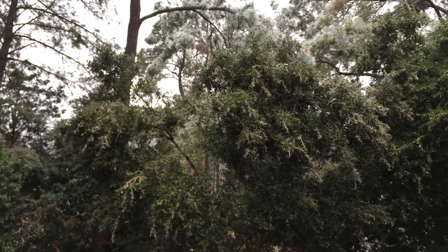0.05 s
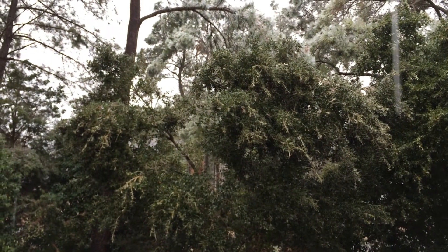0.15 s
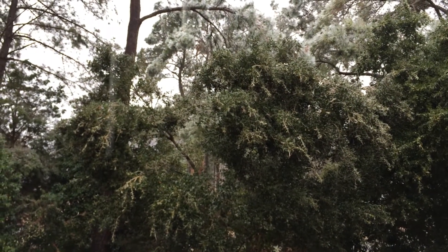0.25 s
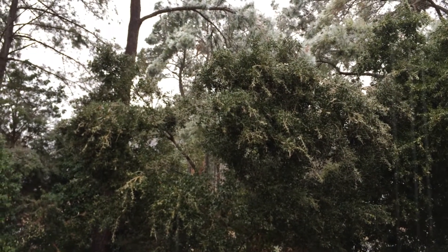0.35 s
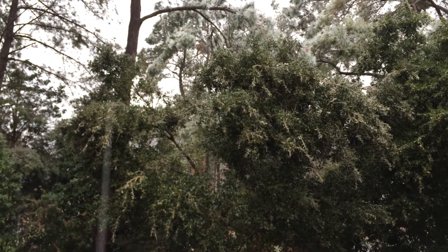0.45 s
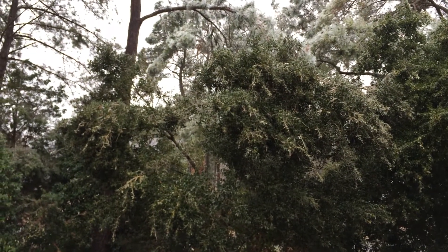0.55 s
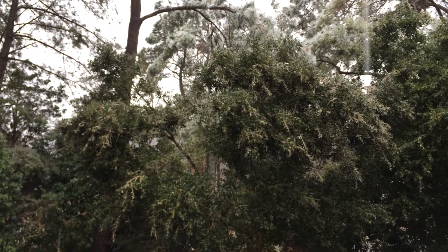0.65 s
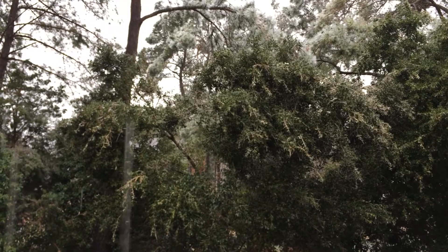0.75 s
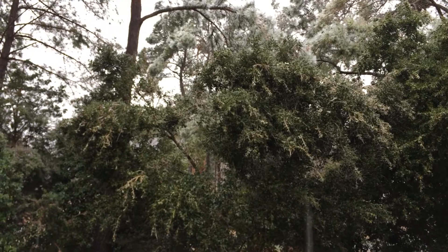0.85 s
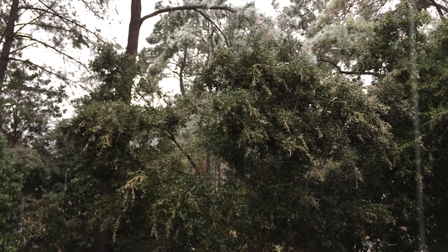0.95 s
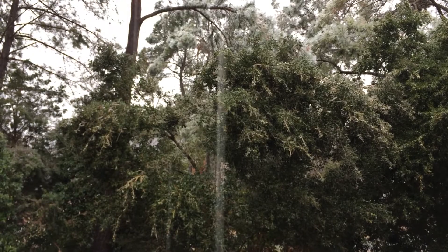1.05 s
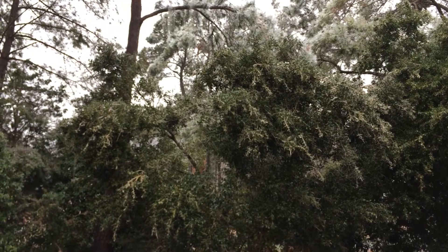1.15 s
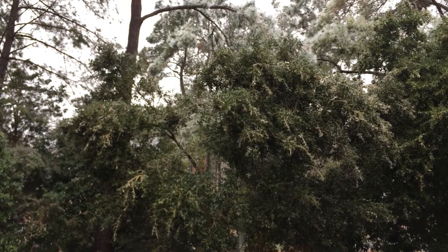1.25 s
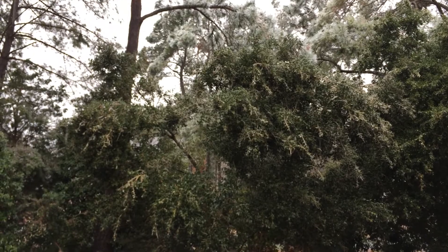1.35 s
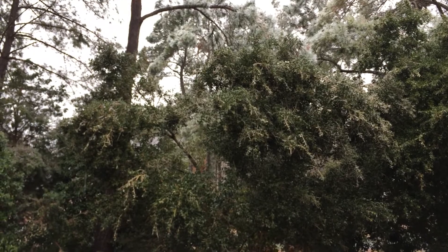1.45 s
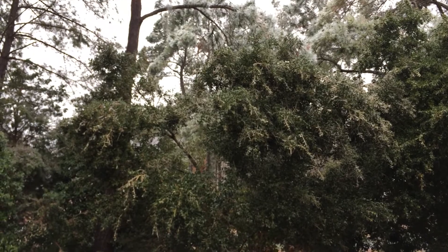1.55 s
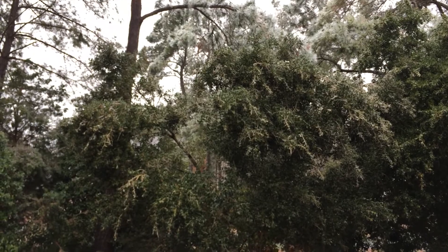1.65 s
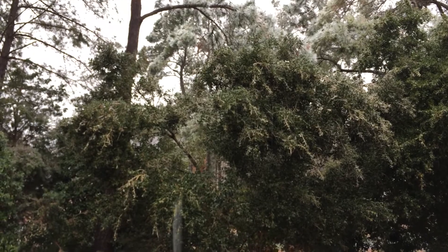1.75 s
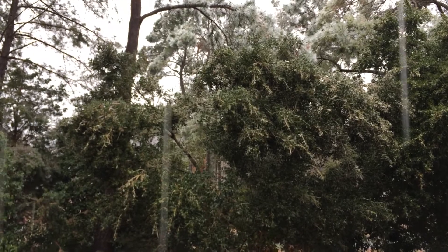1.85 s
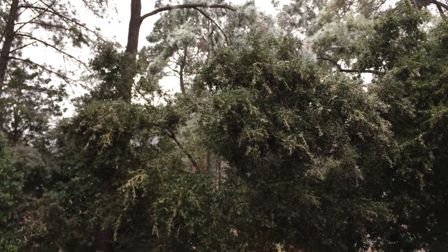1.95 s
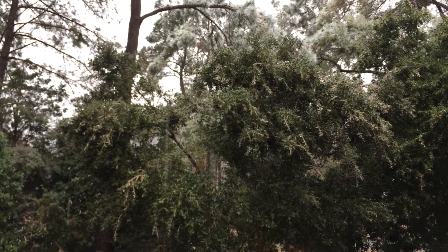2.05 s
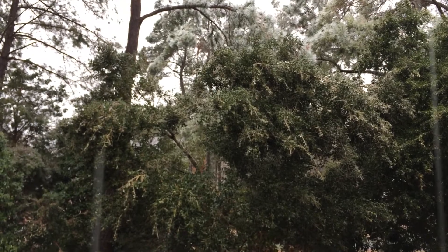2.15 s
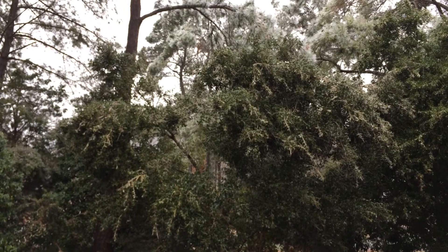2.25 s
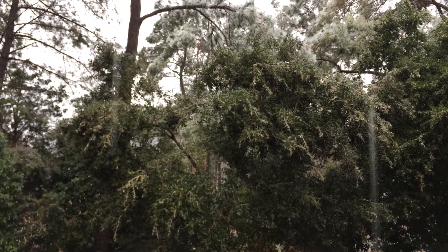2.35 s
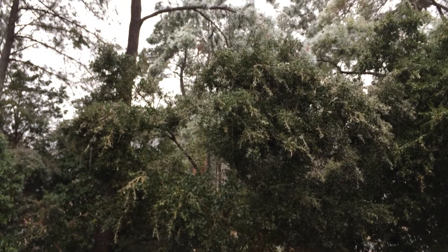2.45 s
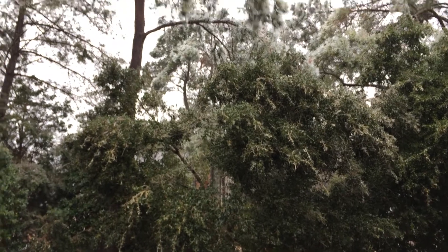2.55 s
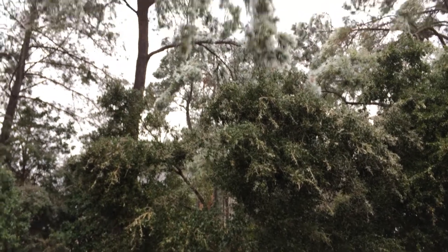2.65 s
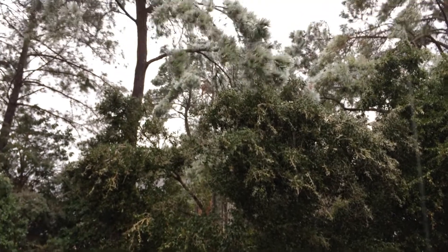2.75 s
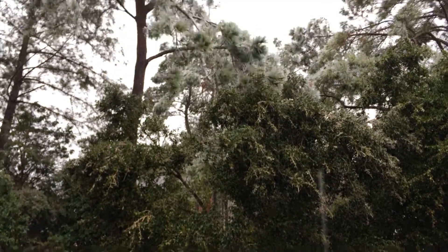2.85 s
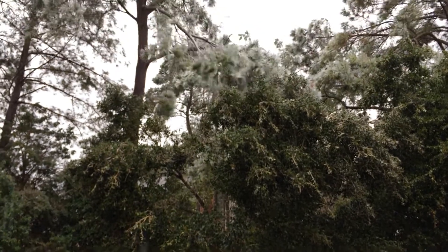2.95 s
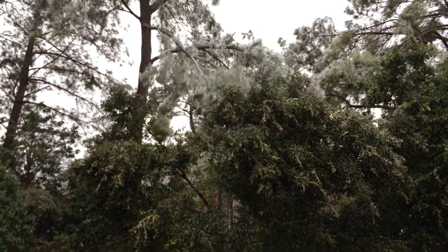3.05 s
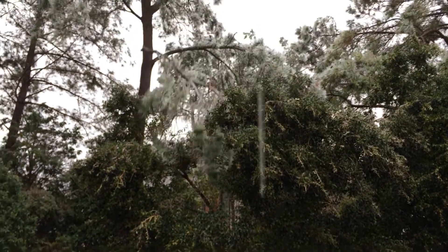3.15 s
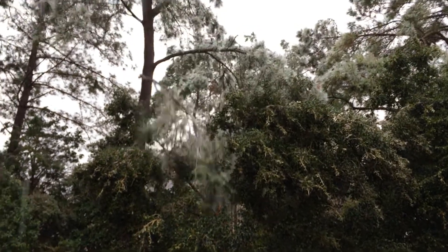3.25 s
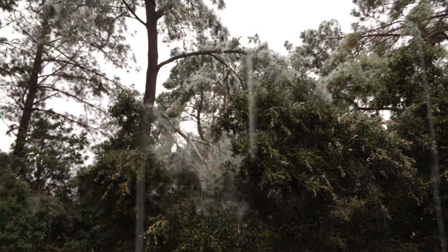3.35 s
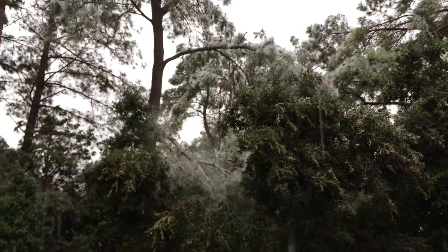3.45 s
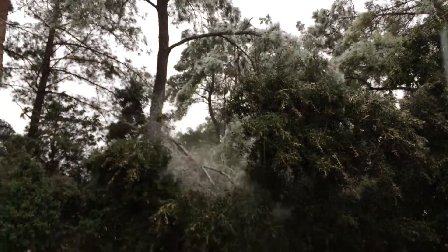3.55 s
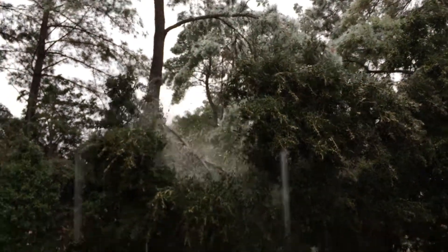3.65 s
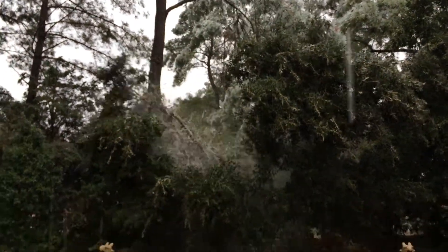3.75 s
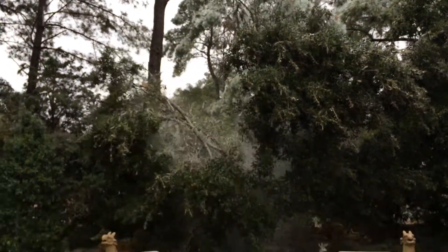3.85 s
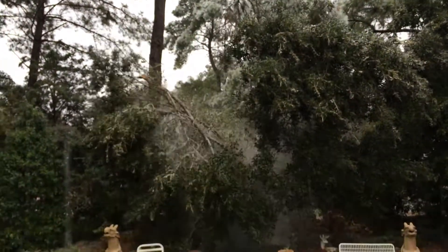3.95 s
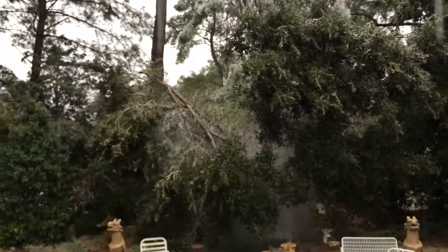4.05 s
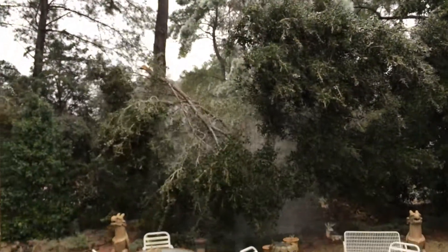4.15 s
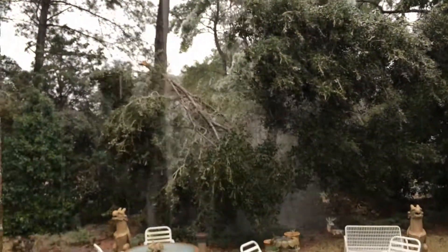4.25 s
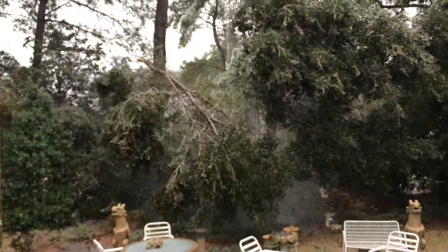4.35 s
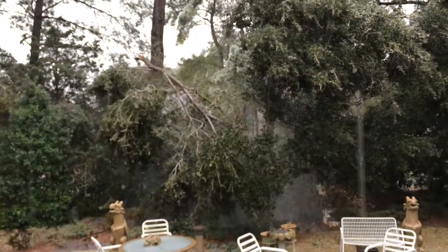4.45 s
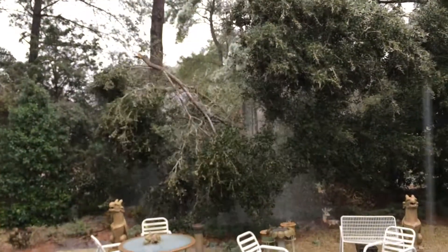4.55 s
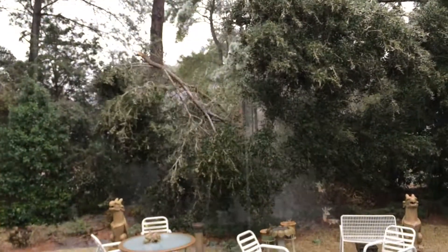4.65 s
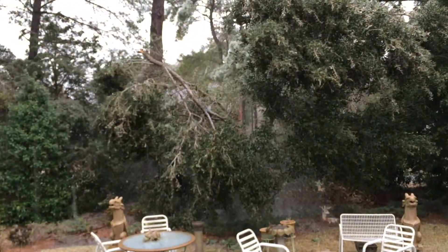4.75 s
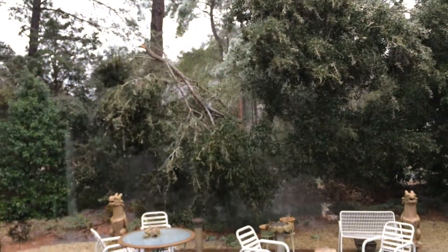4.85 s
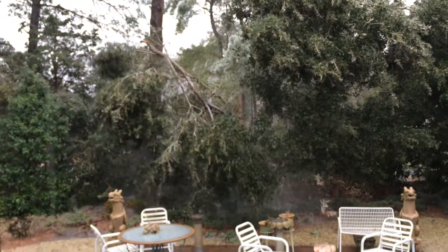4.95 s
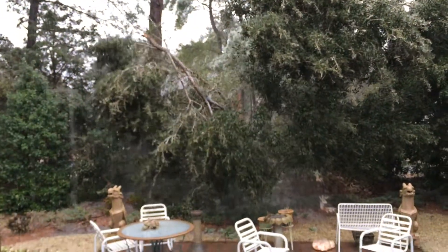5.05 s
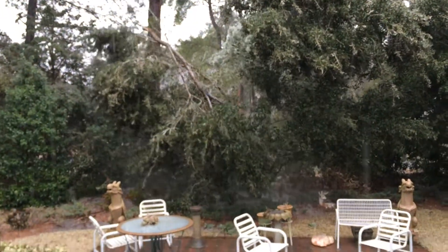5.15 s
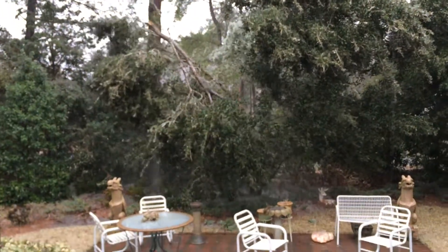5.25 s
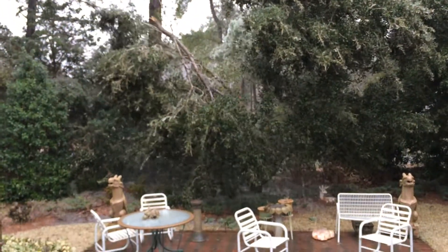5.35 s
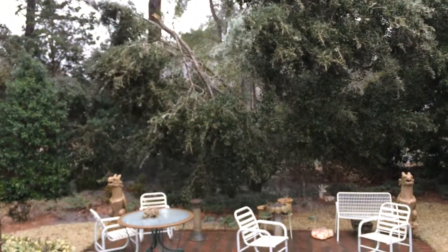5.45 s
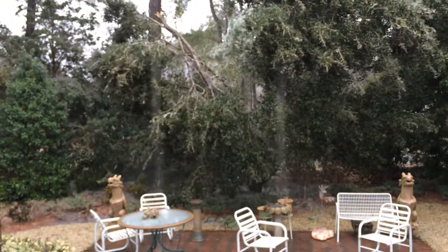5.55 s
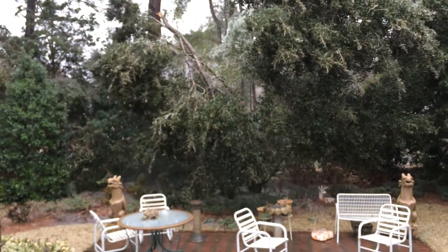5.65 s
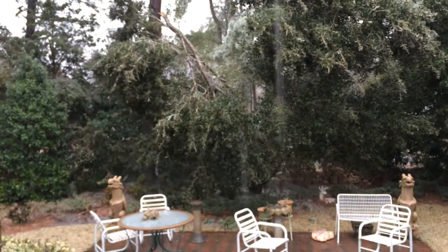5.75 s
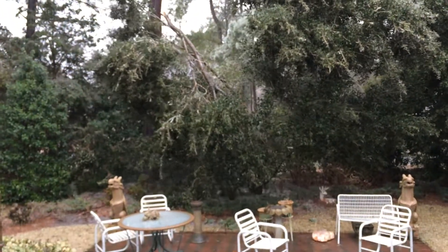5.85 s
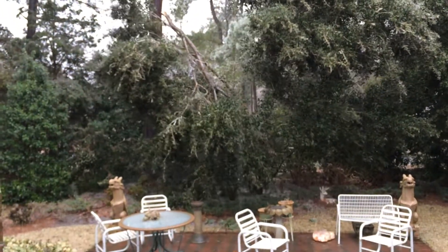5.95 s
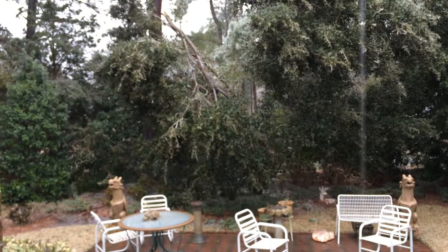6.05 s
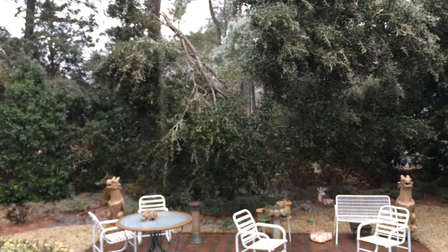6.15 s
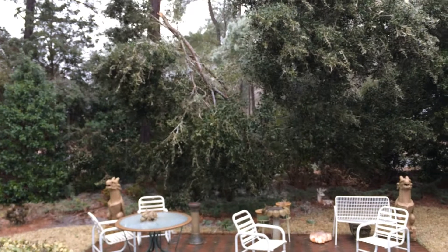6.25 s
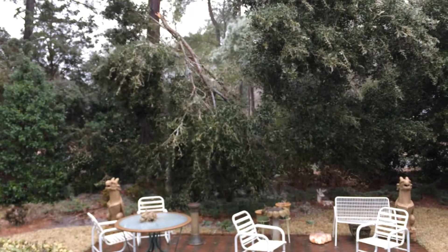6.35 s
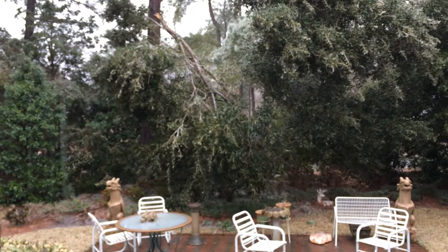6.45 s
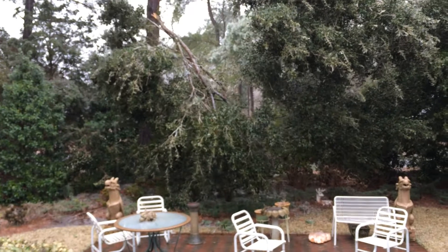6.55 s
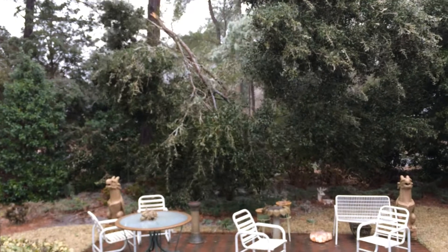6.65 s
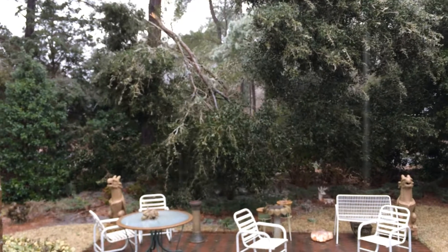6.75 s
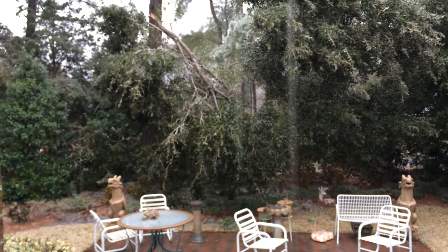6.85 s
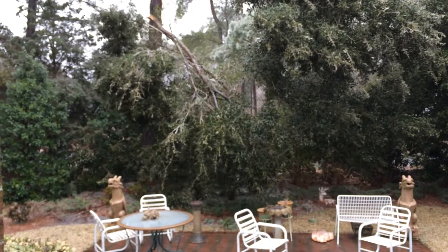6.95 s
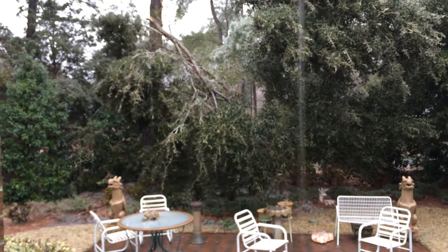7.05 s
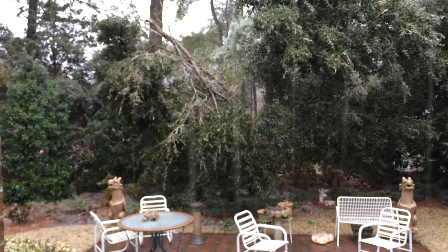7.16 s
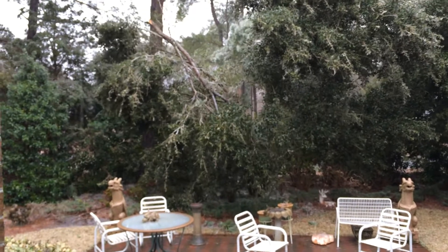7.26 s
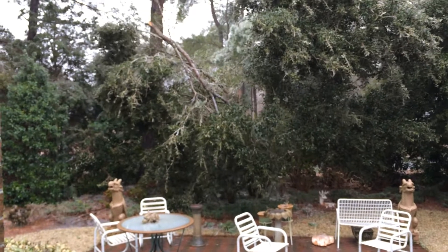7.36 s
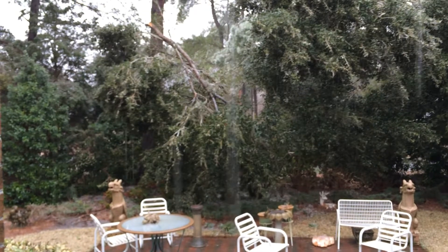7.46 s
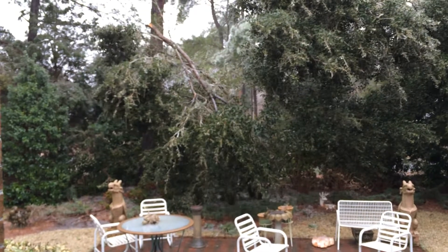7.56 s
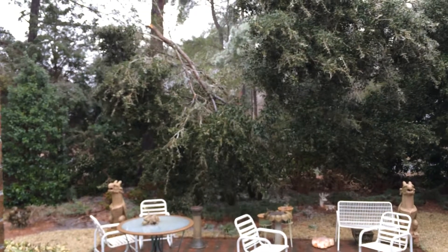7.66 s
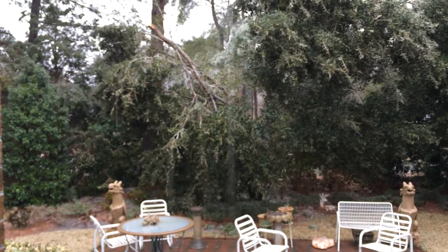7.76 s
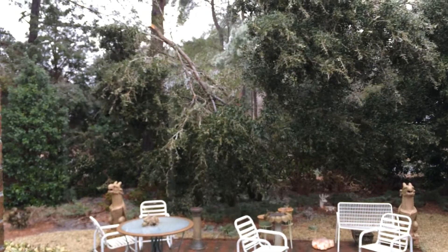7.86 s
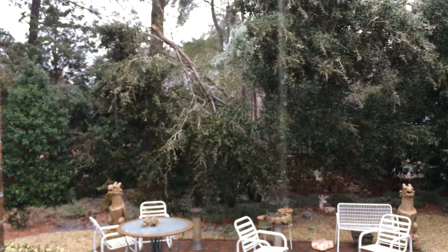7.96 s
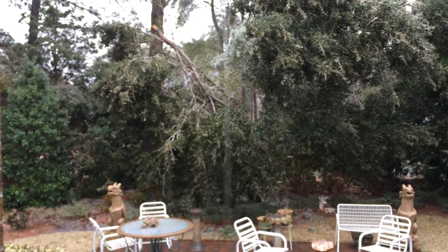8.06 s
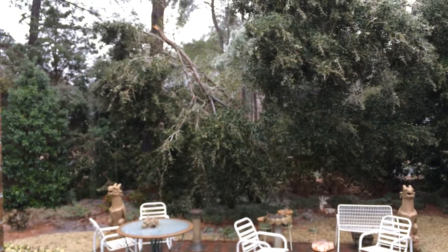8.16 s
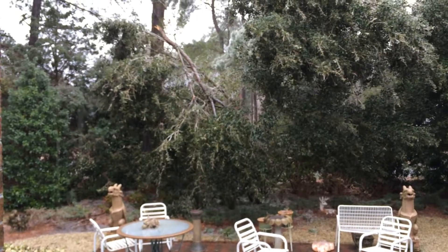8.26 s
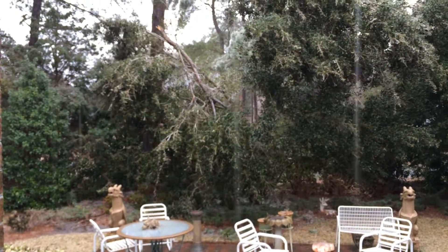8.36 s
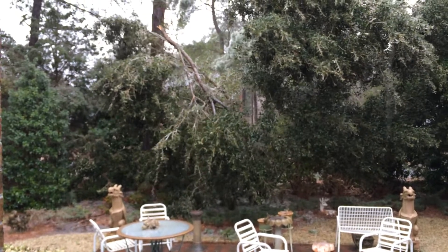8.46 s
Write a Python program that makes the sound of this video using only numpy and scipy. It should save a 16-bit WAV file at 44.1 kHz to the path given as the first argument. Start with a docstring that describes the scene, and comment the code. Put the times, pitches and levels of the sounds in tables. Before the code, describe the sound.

Quiet outdoor yard, centred sound: faint drizzle ticks, soft air noise and a steady low engine throb, probably a generator. From 0.2 to 1.9 seconds, scattered close drops slap and fizz brightly. At 2.0 a hard, loud wooden crack with a short low boom shakes loose a brief sprinkle of ice. Splintering snaps follow, bunching and strengthening from 2.4 to 2.9. From about 3.15 the limb plunges, with a bright rush of shattered ice, clattering twigs, and fierce snaps and knocks around 3.4-3.5 and 3.75-3.85, echoing briefly among trees. Glassy ice keeps hissing and tinkling from 4 to 6, gradually thinning, with sparse knocks. Close drops return at 5.5, growing strong and frequent from 7 to 8.4. The engine dips briefly around 3 and 7; near 7.5 a dull, distant ice load falls, leaving drips, ticks and throb.

```python
"""Drops splash close by in a quiet, dripping garden while an engine, probably a generator, throbs nearby.
Then an ice-laden pine limb snaps high in a tree, tears loose and crashes through the branches below.
Shattered ice showers down for seconds, the trees scatter the sound, and another load falls far off.
Wood is pushes ringing resonances; ice is random clicks and noise; the engine is a train of pulses."""
import sys
import numpy as np
from scipy import signal
from scipy.fft import rfft, irfft, next_fast_len
from scipy.io import wavfile

SR = 44100
rng = np.random.default_rng(int(sys.argv[2]) if len(sys.argv) > 2 else 0)


def materialize(psi):
    """Save the field psi as 16-bit PCM at rate SR to the path in sys.argv[1].

    A 1-D psi becomes a single channel; in a 2-D psi each row is a channel.
    """
    bounded = np.clip(np.atleast_2d(psi).T, -1, 1)
    quanta = np.round(bounded * 32767).astype(np.int16)
    wavfile.write(sys.argv[1], SR, quanta)


N = 375732  # length in samples
TIME = np.arange(N) / SR  # seconds
TOP_HZ = 15250  # upper limit of the recorder and of the drops' slaps


def undb(db):
    """Turn decibels into a gain."""
    return 10 ** (np.asarray(db) / 20)


def unit(x):
    """Scale to an average (rms) level of 1."""
    return x / np.sqrt(np.mean(x ** 2))


def add(out, s, x):
    """Mix x in at time s, in seconds."""
    i = int(s * SR)
    out[i:i + len(x)] += x[:max(N - i, 0)]


def ring(x, hz, width):
    """One resonance, with gain 1 at its centre; a narrow one rings longer."""
    hz, width = min(hz, SR / 3), min(width, SR / 4)
    b, a = signal.iirpeak(hz, hz / width, fs=SR)
    return signal.lfilter(b, a, x)


def cut(x, hz, side, order=2):
    """Keep what lies below ("low") or above ("high") a frequency."""
    sos = signal.butter(order, min(hz, SR / 2 - 1), side, fs=SR, output="sos")
    return signal.sosfilt(sos, x)


def colour(x, points):
    """Shape the spectrum of a long sound by (Hz, dB) points, at rms 1."""
    hz, db = np.transpose(points)
    size = next_fast_len(N)
    f = np.maximum(np.fft.rfftfreq(size, 1 / SR), 1)
    gain = undb(np.interp(np.log(f), np.log(hz), db))
    return unit(irfft(rfft(x, size) * gain, size)[:N])


def walk(rate):
    """Slow random wander around 0, with `rate` new random values per second."""
    knots = rng.standard_normal(N // 100)
    return np.interp(TIME * rate, np.arange(len(knots)), knots)


def swell(s, rise_s, hold_s, fade_s, bend):
    """Gain that reaches 1 at time s, holds and fades; rise and fade are the times for 10 dB."""
    before = np.maximum((s - TIME) / rise_s, 0)
    after = np.maximum((TIME - s - hold_s) / fade_s, 0)
    return undb(-10 * (before + after) ** bend)


def clicks(size, rate, spread_db):
    """Random tiny impacts, `rate` per second, many weak and a few strong, at rms 1."""
    strength = undb(spread_db * np.minimum(rng.exponential(size=size), 5))
    hit = rng.random(size) < rate / SR
    return unit(hit * strength * rng.standard_normal(size) + 1e-9)


def clinks(rate, low_hz, high_hz, cycles, spread_db):
    """Pieces strike at random, each ringing briefly at a pitch of its own; as much power in every Hz."""
    out, t = np.zeros(N), TIME[:SR // 50]
    for when, pitch, chance in rng.random((int(rate * N / SR), 3)):
        hz = low_hz * (high_hz / low_hz) ** pitch
        size = undb(-spread_db * np.log(max(chance, .02)))
        tone = np.sin(2 * np.pi * hz * t) * np.exp(-t * hz / cycles)
        add(out, when * N / SR, size * hz * tone)
    return out


def trees(x, wet_db, low_t60, high_t60):
    """Trunks and foliage return a cloud of small echoes; the treble dies first."""
    t = TIME[:SR]
    echoes = clicks(SR, 5000, 1.3)
    low = cut(echoes, 1900, "low", order=1)
    # each t60 is the time in seconds to fade by 60 dB
    tail = low * undb(-60 * t / low_t60) + 1.8 * (echoes - low) * undb(-60 * t / high_t60)
    tail = cut(tail, 11000, "low", order=1) * (1 - np.exp(-t / 0.0034))
    return x + undb(wet_db) * signal.fftconvolve(x, tail / np.linalg.norm(tail))[:N]


# The hush of the open air. Each row: frequency in Hz, relative level in dB.
AIR_SPECTRUM = [(100, 3.5), (200, -3.5), (300, -8.5), (520, -5), (800, -6.5), (1200, -8), (1900, -11.5),
                (5000, -17.5), (15000, -21.5)]
AIR_DB, TICKS_DB = -51.5, -57.5


def drizzle():
    """Faint ticks, a click and a short hiss each, from all the dripping trees over the noise of the air."""
    t = TIME[:SR // 10]
    splash = rng.standard_normal(len(t)) * np.exp(-t / .014) + 6 * (t == 0)
    splashes = signal.fftconvolve(clicks(N, 70, 1.3), splash)[:N]
    ticks = unit(cut(splashes, 3500, "high"))
    air = colour(rng.standard_normal(N), AIR_SPECTRUM) * undb(AIR_DB + 0.14 * walk(11))
    return undb(TICKS_DB) * ticks + air


# The engine's exhaust. Each row: frequency in Hz, relative level in dB.
EXHAUST_SPECTRUM = [(22, -54), (30, -29), (44, -19), (60, 8), (90, 8), (120, 0.5), (150, -4), (180, -10.5),
                    (270, -21), (380, -17), (600, -38), (2000, -60)]
# The throb sinks for a while. Each row: start of the full dip in seconds, rise in seconds,
# hold in seconds, fade in seconds, depth in dB. After one rise or fade time a third of the depth is left.
ENGINE_LULLS = [(3.05, 0.28, 0.53, 0.98, -5.5), (7.006, 0.03, 0.78, 0.11, -7.5)]
FIRING_HZ, ENGINE_DB = 30, -42


def engine():
    """Evenly governed firings, alternately strong and weak, boom through a muffler and smear on the way."""
    firings, t = np.zeros(N), TIME[:SR // 20]
    for k, (late, size) in enumerate(rng.standard_normal((int(N / SR * FIRING_HZ), 2))):
        pulse = undb([1.1 * size - 2.5 * (k % 2 == 0)])
        add(firings, (k + .6) / FIRING_HZ + .0003 * late, pulse)
    # the muffler's resonances hold each pitch back by a different time
    for hz in (120, 210, 300):
        firings = firings - 2 * ring(firings, hz, 34)
    throb = colour(firings - firings.mean(), EXHAUST_SPECTRUM)
    rumble = undb(-11) * colour(rng.standard_normal(N), EXHAUST_SPECTRUM)
    level_db = ENGINE_DB + sum(depth_db * swell(*timing, bend=1.8) for *timing, depth_db in ENGINE_LULLS)
    return (throb + rumble) * undb(level_db)


STRAY_PER_S, STRAY_DB, STRAY_SPREAD_DB = 2.2, -37, 6  # peak level, give or take the spread
STRAY_HZ, STRAY_WIDTH_HZ = 11000, 5000  # middle pitch, which varies by half an octave; width of the ring
STRAY_TICK_DB, STRAY_SPRAY_DB = -16, -16


def stray_drops():
    """Small drops at random moments, as rows like those of the near drops."""
    chance = rng.uniform(-1, 1, (int(STRAY_PER_S * N / SR), 3))
    rows = []
    for when, size, pitch in chance:
        s, db = abs(when) * N / SR, STRAY_DB + STRAY_SPREAD_DB * size
        hz = STRAY_HZ * 2 ** (pitch / 2)
        rows.append((s, db, hz, STRAY_WIDTH_HZ, STRAY_TICK_DB, STRAY_SPRAY_DB))
    return rows


# Near drops and bits of ice. Each row: touch-down in seconds, peak of the slap in dB, ring in Hz,
# width of the ring in Hz, dry tick against the ring in dB, spray against the slap in dB.
NEAR_DROPS = [ (.2056, -21.5, 6800, 4000, -22, -11.5), (.2987, -24.5, 6800, 2000, -22, -17),
              (.4075, -27.5, 5960, 2500, -5, -20.5), (.493, -28, 4330, 1500, -7, -13.5),
              (.94, -36, 12000, 5000, -15, -21), (.983, -27, 4550, 700, -13, -17),
              (1.047, -23.5, 5000, 3000, -2, -22), (1.261, -29, 11300, 6000, -15, -24),
              (1.381, -34, 9000, 6000, -20, -19), (1.4185, -23, 14000, 3000, 0, -31),
              (1.4913, -24.5, 5750, 3000, -6, -19), (1.787, -24.5, 4730, 1600, -5, -18),
              (1.801, -15.5, 12200, 7000, -23, -26), (1.9128, -26.5, 5050, 2500, -5, -29),
              (1.935, -29, 13000, 7000, -20, -16), (5.494, -19, 4300, 1500, -26, -2.5),
              (5.802, -20, 5500, 3000, -18, -17), (6.0126, -19, 5000, 3000, -18, -19),
              (6.38, -21, 4500, 2000, -20, -17), (6.4494, -25, 5480, 3000, -14, -20),
              (6.7294, -27, 4330, 1500, -20, -16), (6.775, -24, 12100, 7000, -20, -18),
              (6.7994, -28, 4540, 1500, -18, -17), (6.8894, -27.5, 4030, 900, -22, -15),
              (6.9925, -15, 3570, 2000, -20, -15), (7.1721, -24.5, 5150, 900, -12, -19),
              (7.1804, -27, 7600, 3000, -15, -14), (7.2565, -24, 7200, 4000, -22, -15),
              (7.3747, -22, 4500, 2500, -16, -14), (7.3811, -10, 13900, 4000, -3, -28),
              (7.489, -25.5, 4500, 2500, -22, -13), (7.698, -12, 7450, 4500, -8, -22),
              (7.8565, -18.5, 4530, 3000, -18, -10.5), (7.916, -15, 4670, 2600, -20, -14),
              (7.925, -11.5, 3300, 1990, -31, -15.5), (7.973, -29, 11500, 7000, -20, -22),
              (8.066, -15, 13000, 7000, -17, -24.5), (8.3125, -20.5, 5400, 1800, -19, -20),
              (8.3835, -25.5, 4080, 1800, -18, -11.5)]
SLAP_S, SLAP_ECHO_S, SPRAY_S = 0.00092, .0041, 0.0033  # delays after the drop touches
SLAP_ECHO_DB = -4  # the repeat against the slap


def splash_tone(x, hz, width_hz, tick_db):
    """A drop rings at its pitch beside a dry tick; small drops have no low end."""
    lowest_hz = min(0.51 * hz, 3000)
    return cut(ring(x, hz, width_hz) + undb(tick_db) * x, lowest_hz, "high", order=3)


def drops():
    """A drop slaps down, a hard surface nearby repeats the slap, and its fine spray fizzes after it."""
    out, t = np.zeros(N), TIME[:SR // 5]
    for s, db, *timbre, spray_db in list(NEAR_DROPS) + stray_drops():
        impact = (t == 0) + .1 * rng.standard_normal(len(t)) * np.exp(-t / .0008)
        slap = cut(splash_tone(impact, *timbre), TOP_HZ, "low")
        slap = undb(db) * slap / np.abs(slap).max()
        droplets = clicks(len(t), 14000, .9)
        fizz = droplets * (np.exp(-t / 0.0078) + 1.02 * np.exp(-t / 0.028))
        spray = splash_tone(fizz, *timbre)
        add(out, s + SLAP_S, slap)
        add(out, s + SLAP_ECHO_S, undb(SLAP_ECHO_DB) * slap)
        add(out, s + SPRAY_S, undb(db + spray_db) * spray)
    return out


# The distant load of ice. Each row: frequency in Hz, relative level in dB.
FAR_SPECTRUM = [(150, -34), (350, -1), (550, 1), (800, 0.5), (1200, 4), (1800, -2), (3000, -9), (8000, -38)]
FAR_S, FAR_DB, FAR_RISE_S, FAR_FADE_S = 7.52, -43.5, 0.042, 0.36


def far_ice():
    """Far off, a load of ice comes down as a dull burst of many small impacts."""
    fall = undb(FAR_DB) * swell(FAR_S, FAR_RISE_S, 0, FAR_FADE_S, bend=0.77)
    return colour(clicks(N, 3000, 0.7), FAR_SPECTRUM) * fall


# Knocks of falling wood and ice. Each row: start in seconds, peak before the echoes in dB, pitch in Hz.
DEBRIS_KNOCKS = [ (.872, -38.5, 710), (1.2, -44, 233), (2.696, -25.5, 540), (2.814, -26, 480),
                 (2.942, -31.5, 312), (3.175, -23, 1170), (3.259, -22, 1350), (3.396, -21.5, 776),
                 (3.398, -30, 352), (3.479, -25.5, 363), (3.48, -13, 1130), (3.492, -27, 390),
                 (3.741, -19, 800), (3.751, -29, 393), (3.854, -20.5, 960), (3.976, -22.5, 1530),
                 (4.274, -30, 1090), (4.779, -31.5, 800), (4.892, -28, 1570), (5.28, -28, 1710),
                 (5.507, -29, 1860), (5.734, -37, 764), (5.877, -34, 715), (6.146, -37.5, 700),
                 (6.271, -36.5, 1130), (7.531, -27, 1200), (7.532, -44, 454), (7.67, -35, 1200),
                 (7.877, -38, 1400), (8.108, -38, 1290)]


def debris():
    """Loose pieces knock against branches and ground; they and the far ice echo among the trees."""
    out, t = far_ice(), TIME[:SR // 4]
    for s, db, hz in DEBRIS_KNOCKS:
        blow = (t == 0) + 0.078 * rng.standard_normal(len(t)) * np.exp(-t / 0.0093)
        knock = ring(ring(blow, hz, 0.27 * hz), hz, 1.04 * hz)
        add(out, s, undb(db) * knock / np.abs(knock).max())
    return trees(out, wet_db=-11.5, low_t60=0.93, high_t60=0.27)


# Loads of ice shaken loose. Each row: start of full flow in seconds, rise in seconds, hold in seconds,
# fade in seconds, fine shards in dB, chunks and twigs in dB. In turn: the first crack shakes the limb,
# it tears loose, its icy needles sweep the treetops, it crashes through the branches,
# the struck branches shed their ice, and a last trickle falls.
ICE_SHOWERS = [ (2.033, .01, .03, .16, -35.5, -56), (2.546, 0.25, 0.44, 0.14, -53, -38),
               (3.237, 0.23, 0.46, .17, -20.5, -47), (3.173, 0.043, 0.54, .17, -45, -31.5),
               (3.875, 0.82, 0.22, 1.89, -25.5, -37.5), (6, 1, 2.3, 3.9, -51.5, -62)]
SHOWER_BEND = 1.65  # a shower fades slowly at first, then ever faster


def ice_flow():
    """Strength of the fine shards and of the chunks over time; overlapping showers add in power."""
    power = 0
    for *timing, fine_db, chunk_db in ICE_SHOWERS:
        power = power + np.outer(undb([fine_db, chunk_db]), swell(*timing, SHOWER_BEND)) ** 2
    return np.sqrt(power)


# Fine ice. Each row: frequency in Hz, relative level in dB.
SHARD_SPECTRUM = [(200, -47), (700, -15), (1500, -8.5), (2300, -7.5), (2900, -3), (4300, -3), (6300, -1),
                  (8200, -3), (11000, -4.5), (15500, -6.5)]
# Heavy ice and twigs. Each row: frequency in Hz, relative level in dB.
CHUNK_SPECTRUM = [(100, -17), (215, -8), (300, -1), (390, -1.5), (560, -4.5), (750, 1), (930, -1),
                  (1150, 3), (2000, 2.5), (2700, -0.5), (5000, 2), (15000, -19.5)]


def ice_shower():
    """Countless shards merge into a wash that thins to single ticks; heavier chunks and twigs clatter."""
    fine, coarse = ice_flow()
    wash = colour(rng.standard_normal(N), SHARD_SPECTRUM) * undb(.5 * walk(25))
    # single shards fade more slowly than the wash, so they stand out as the fall thins
    ticks = colour(clicks(N, 500, 2.2), SHARD_SPECTRUM) * fine ** .7 * undb(-23)
    shards = colour(clinks(900, 2500, 14000, 6, 2.2), SHARD_SPECTRUM) * undb(-7)
    chunks = colour(clicks(N, 5000, 0.54), CHUNK_SPECTRUM) * undb(1.1 * walk(30))
    twigs = colour(clinks(520, 300, 4500, 4, 1.5), CHUNK_SPECTRUM) * undb(-3)
    return (wash + shards) * fine + ticks + (chunks + twigs) * coarse


# The limb's own resonances. Each row: frequency in Hz, width in Hz, level in dB.
LIMB_MODES = [(308, 150, 0), (384, 77, 2), (470, 120, -3), (774, 144, 7), (1100, 980, 2), (1790, 680, 2.5),
              (2840, 320, 0.5), (3900, 430, -1), (5970, 2000, -5.5)]


def wood(push, ring_hz, width_hz, ring_db, lowest_hz):
    """A push rings the limb's modes and the piece that breaks off; nothing sounds below the lowest frequency
    the wood reaches."""
    # every break lies elsewhere on the limb, so the modes shift a little
    shift = 1 + .04 * rng.standard_normal(len(LIMB_MODES))
    body = 0
    for k, (hz, width, db) in enumerate(LIMB_MODES):
        body = body + (-1) ** k * undb(db) * ring(push, hz * shift[k], width)
    piece = ring(ring(push, ring_hz, width_hz), ring_hz, width_hz)
    # the push takes a moment to travel along the wood to that piece
    piece = np.pad(piece, (SR // 2000, 0))[:len(push)]
    sound = cut(body + undb(ring_db) * piece + 0.066 * push, lowest_hz, "high", order=4)
    return cut(sound, 23000, "low", order=1)  # cut() holds this just under half the sample rate


# The bough's bending modes. Each row: frequency in Hz, width in Hz, level in dB.
BOUGH_MODES = [(156, 12, 2.5), (273, 43, 2), (400, 140, 5), (495, 130, 1.5)]
# A mode of this pitch swells in this time; lower ones take longer by this power.
BOOM_HZ, BOOM_SWELL_S, BOOM_LAG = 300, 0.012, 0.92


def flex(t, hz, width):
    """One bending mode of the bough; the strain is let go gradually, so low modes swell last."""
    swell_s = BOOM_SWELL_S * (BOOM_HZ / hz) ** BOOM_LAG
    push = clicks(len(t), 2000, 0.41) * t * np.exp(-t / swell_s)
    return unit(ring(ring(push, hz, width), hz, .5 * hz))


# Breaking wood. Each row: start in seconds, peak of the snap in dB, rms of the splintering in dB before
# its fade, tearing time in seconds, ring of the broken piece in Hz, width of that ring in Hz,
# its level against the limb in dB, lowest frequency in Hz (thick wood reaches lower).
WOOD_CRACKS = [ (2.004, -29, -38, .008, 1970, 450, 17, 900), (2.0166, -4.5, -22, .004, 1800, 550, 9, 450),
               (2.022, -13, -21, 0.024, 425, 200, -1, 300), (2.043, -11, -24.5, 0.017, 1710, 1500, 10, 600),
               (2.135, -30, -34, 0.035, 960, 600, 12, 600), (2.156, -17.5, -35, 0.0056, 3630, 2500, 7, 900),
               (2.199, -27, -37.5, 0.0088, 4500, 3000, -9, 900),
               (2.264, -19.5, -39, .008, 1490, 1198, 13, 595),
               (2.387, -30, -44, 0.011, 3050, 1200, -2, 900),
               (2.4178, -6.5, -23, 0.0024, 2820, 500, 10.5, 845),
               (2.4436, -6, -36, 0.0034, 5930, 4500, 3, 775), (2.447, -14, -26.5, 0.02, 1500, 990, 7, 500),
               (2.529, -14.5, -28, 0.0065, 1380, 1200, 11, 795),
               (2.5758, -5.5, -19.5, 0.013, 1030, 850, 13, 696),
               (2.637, -6, -21.5, 0.007, 2870, 800, 8, 420), (2.6526, -2, -20.5, 0.023, 3180, 1390, 7, 600),
               (2.664, -13, -26, .006, 1100, 600, 11, 500), (2.772, -25, -36, 0.0044, 570, 400, 13, 420),
               (2.785, -27, -35, .015, 1700, 1200, 14, 500), (2.8178, -17, -29, 0.012, 1470, 900, 11, 372),
               (2.9043, -16, -31, 0.0093, 1460, 600, 5, 1110),
               (2.9171, -11, -29, 0.022, 5950, 4500, 1, 348), (3.147, -24, -34, 0.026, 1190, 700, 13, 500),
               (3.396, -5, -20, 0.0044, 2800, 1800, 11, 700), (3.402, -4.5, -27, .004, 4200, 1500, 8, 700),
               (3.423, -10, -31, .004, 3300, 1500, 6, 1500), (3.478, -4, -16, .003, 3240, 1510, 7, 400),
               (3.741, -14, -24, 0.0035, 1500, 400, 13, 600),
               (3.753, -11.5, -23, .007, 2800, 1200, 10, 328),
               (3.8536, -8.5, -23.5, .005, 3500, 1200, 6, 425)]
# The whole bough jolts as its load is let go. Each row: start in seconds, peak in dB.
BOUGH_JOLTS = [(2.017, -14), (2.44, -28.5), (2.578, -32), (2.645, -26.5), (2.815, -38)]


def limb():
    """Each break is one sharp snap, then a run of fibres tearing; the big ones jolt the whole bough."""
    out, t = np.zeros(N), TIME[:SR // 3]
    for s, snap_db, splinter_db, tear_s, *timbre in WOOD_CRACKS:
        release = np.exp(-t / .00005) + .33 * rng.standard_normal(len(t)) * np.exp(-t / .0016)
        snap = wood(release, *timbre)
        snap = snap / np.abs(snap).max()
        fibres = unit(wood(clicks(len(t), 5000, 2.3), *timbre))
        fade_s = 0.0098 + 0.66 * tear_s  # a clean break stops at once, a long tear trails off
        tearing = (1 - np.exp(-t / 0.0008)) * np.exp(-np.maximum(t - tear_s, 0) / fade_s)
        add(out, s, undb(snap_db) * snap + undb(splinter_db) * fibres * tearing)
    for s, db in BOUGH_JOLTS:
        boom = sum(undb(mode_db) * flex(t, hz, width) for hz, width, mode_db in BOUGH_MODES)
        add(out, s, undb(db) * boom / np.abs(boom).max())
    return trees(out, wet_db=-9.5, low_t60=0.58, high_t60=0.45)


def scene():
    """Everything lies in the centre, the same in both ears."""
    yard = drizzle() + engine() + drops() + debris() + ice_shower() + limb()
    return np.array([yard, yard])


def record(dry):
    """The recorder rounds the highest peaks and cuts the top."""
    rounded = np.tanh(dry)
    return signal.sosfilt(signal.ellip(10, .2, 70, TOP_HZ, fs=SR, output="sos"), rounded)


dry = scene()
out = record(dry)
materialize(out)
```